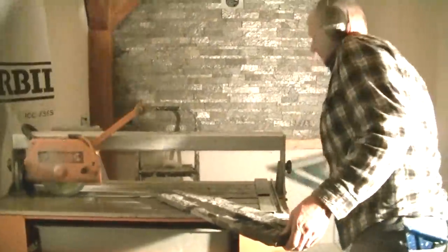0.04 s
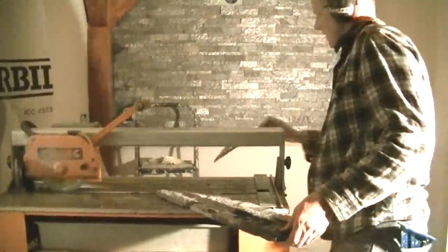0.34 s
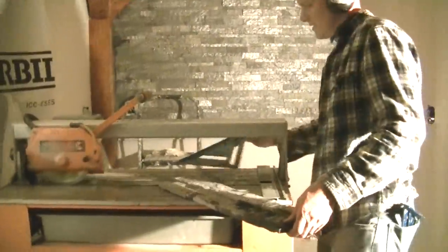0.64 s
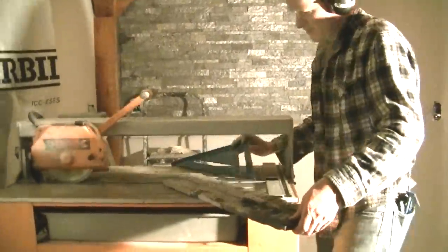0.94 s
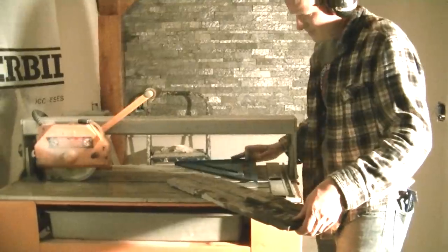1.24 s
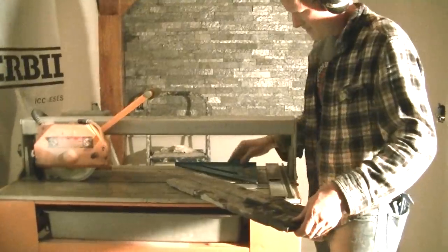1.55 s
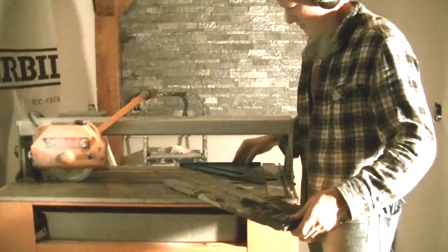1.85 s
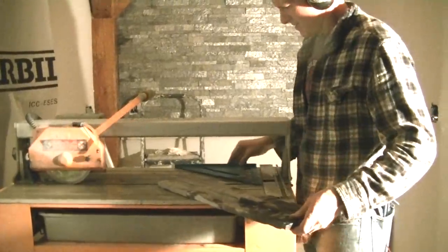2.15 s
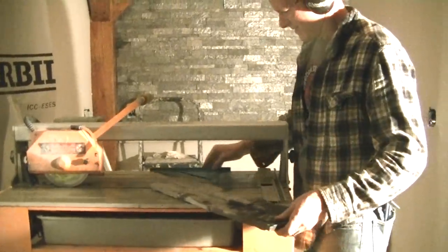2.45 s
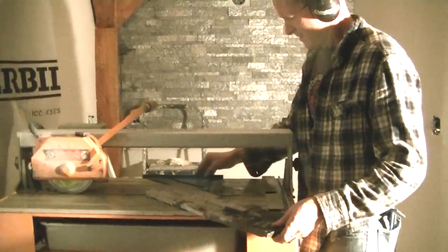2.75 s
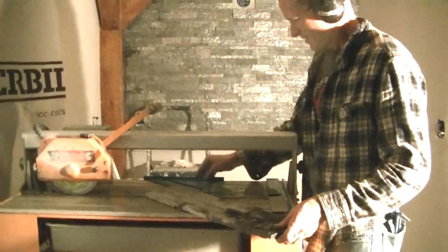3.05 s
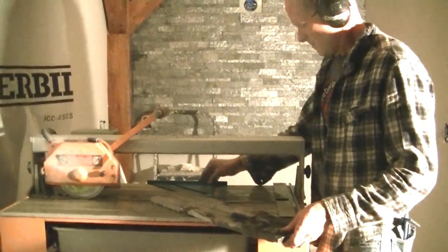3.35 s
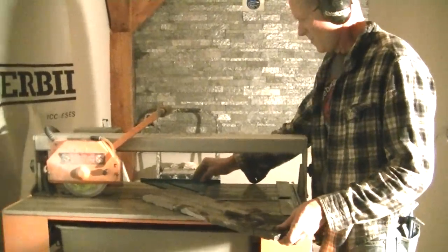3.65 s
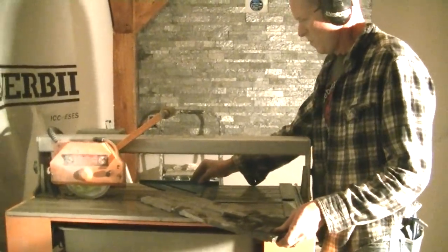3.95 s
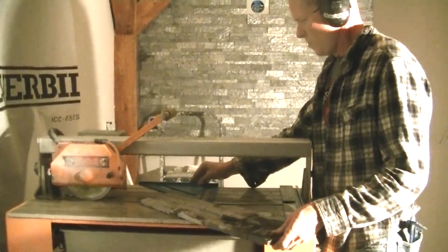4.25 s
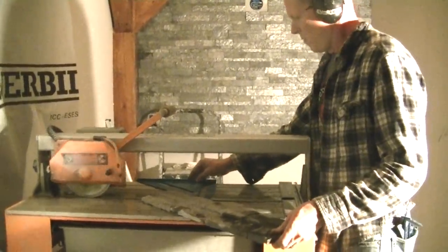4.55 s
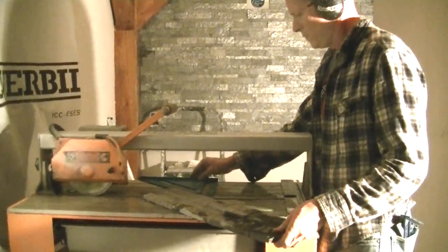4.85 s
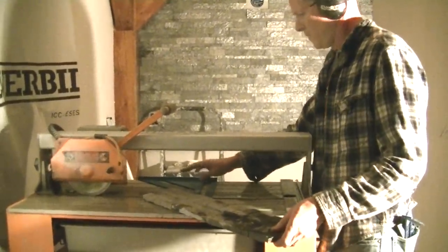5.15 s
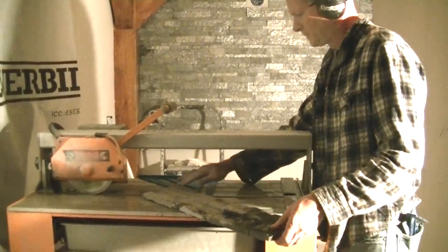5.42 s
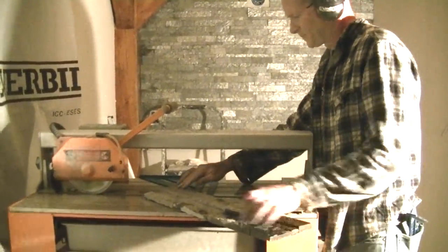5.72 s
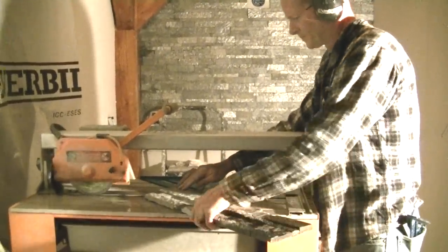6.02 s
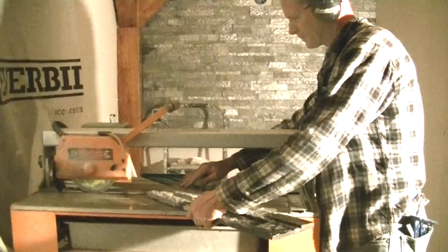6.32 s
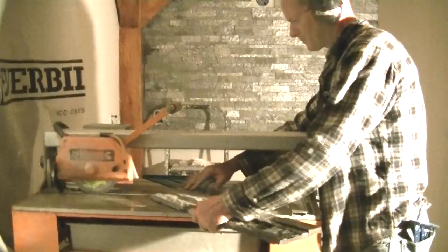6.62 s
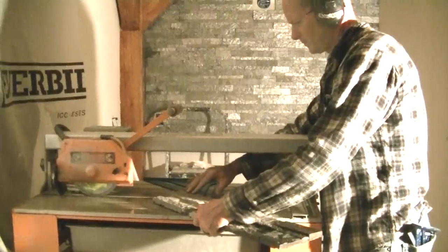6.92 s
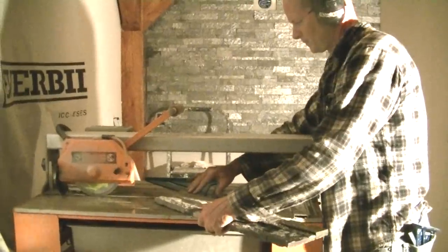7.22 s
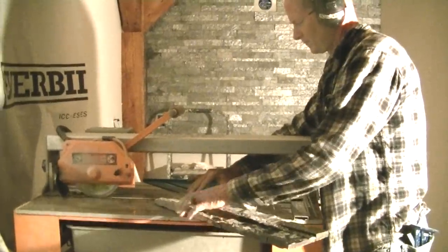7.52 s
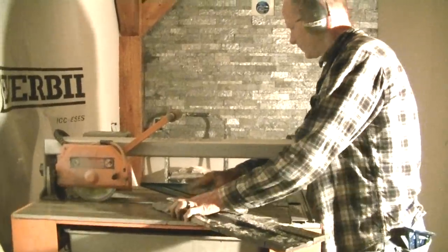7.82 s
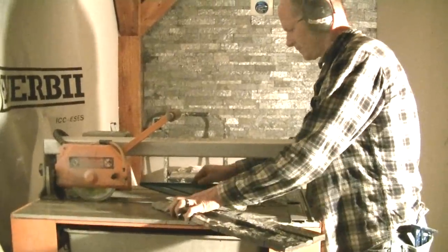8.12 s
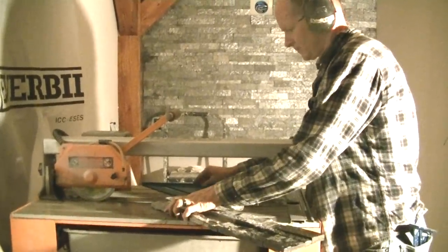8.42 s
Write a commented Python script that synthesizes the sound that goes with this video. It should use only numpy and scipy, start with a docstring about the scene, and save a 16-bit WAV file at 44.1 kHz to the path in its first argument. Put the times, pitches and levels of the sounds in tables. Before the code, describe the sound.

After a faint scrape, a metal set square clangs loudly against a saw rail at about 0.4 seconds and rings until it touches the metal table at 0.8. Hard knocks and short scrapes follow until 2 seconds, each with a thin metallic ring. The square is then pushed against stone strips in long, gritty slides, from about 2.1 to 3 and 3.2 to 3.9 seconds, with scattered knocks and a low judder from the table. A shorter drag comes around 4.4, then light taps until 5.1. After a pause, another uneven scrape runs from about 6.4 to 6.9 seconds, with knocks that make the stone clink. Small, quiet nudges follow, with a sharper clinking knock near 8.3 and a last brief scrape or two. Everything has the short echo of a bare workshop, over a soft steady hiss.

```python
"""In a bare, echoing workshop, a metal set square is picked off the rail of a tile saw with a clang,
put down on the saw table and pushed against stone strips: knocks, long gritty slides, later short nudges.
Each knock and slide shakes the table and sets the metal ringing; the later knocks make the stone clink.
A soft hiss lies under it all, and a limiter flattens the hardest blows."""
import sys
import numpy as np
from scipy import signal
from scipy.fft import rfft, irfft
from scipy.io import wavfile
from scipy.ndimage import uniform_filter1d

SR = 44100
rng = np.random.default_rng(int(sys.argv[2]) if len(sys.argv) > 2 else 0)


def master_out(mix):
    """Clip the mix to full scale and print it as 16-bit PCM to the path in sys.argv[1]."""
    frames = np.transpose(np.atleast_2d(mix))
    ceiling = np.clip(frames, -1, 1)
    pcm = np.round(ceiling * 32767).astype(np.int16)
    wavfile.write(sys.argv[1], SR, pcm)


N = 382347
TIME = np.arange(N) / SR


def from_db(db):
    """Turn decibels (dB) into a number to multiply a sound by."""
    return 10 ** (np.asarray(db) / 20)


def rms_one(x):
    """Scale a sound so that its average power is 1."""
    return x / np.sqrt(np.mean(x ** 2) + 1e-20)


def at_hz(points, hz):
    """Read between the rows of a (frequency, value) table, giving each octave equal room."""
    row_hz, values = np.transpose(points)
    return np.interp(np.log(np.maximum(hz, 1)), np.log(row_hz), values)


def drift(rate):
    """A random curve around zero that heads for a new value `rate` times a second."""
    return np.interp(TIME * rate, np.arange(8192), rng.standard_normal(8192))


def fade(age, t60):
    """A dying away: t60, the fade time, is the seconds it takes to drop by 60 dB."""
    return np.exp(-np.log(1000) * age / t60)


def ring(force, hz, t60):
    """Each push starts a pure tone that dies away."""
    keep, turn = from_db(-60 / (t60 * SR)), 2 * np.pi * hz / SR
    return signal.lfilter([0, np.sin(turn)], [1, -2 * keep * np.cos(turn), keep * keep], force + 1e-18)


def resonate(x, hz, width_hz):
    """Let through only a narrow band around one pitch."""
    keep, turn = np.exp(-np.pi * width_hz / SR), 2 * np.pi * hz / SR
    feed = (1 - keep * keep) / 2 * np.array([1, 0, -1])
    return signal.lfilter(feed, [1, -2 * keep * np.cos(turn), keep * keep], x)


def colour(x, spectrum, peaks=(), size=16384):
    """Give a sound a smooth balance of lows and highs, with ringing peaks on top."""
    hz = np.arange(size // 2 + 1) * SR / size
    lift = 1 + sum(from_db(db) / (1 + (2 * (hz - centre) / width) ** 2) for centre, width, db in peaks)
    # these two steps build a filter that rings after a hit, never before it
    cepstrum = irfft(np.log(from_db(at_hz(spectrum, hz)) * lift))
    response = irfft(np.exp(rfft(2 * cepstrum[:size // 2], size)))
    return signal.fftconvolve(x, response / np.linalg.norm(response))[:N]


def shade(x, zone_db, edges_hz=(500, 2200, 6000)):
    """Set the levels of four zones, from low to high: thump, body, clack and tick."""
    out = 0
    for edge, db in zip(edges_hz, zone_db):
        low = np.tile(signal.butter(2, edge, "low", fs=SR, output="sos"), (2, 1))
        high = np.tile(signal.butter(2, edge, "high", fs=SR, output="sos"), (2, 1))
        out = signal.sosfilt(low, out + x * from_db(db) + 1e-18)
        x = signal.sosfilt(high, x + 1e-18)
    return out + x * from_db(zone_db[-1])


def hiss(level_db, side_db):
    """A steady background hiss, spread wide between left and right."""
    # The tone of the hiss. Each row: frequency in Hz, level in dB.
    spectrum = [(18, -29), (30, -6.5), (44, -13), (55, -20.5), (123, -4.5), (148, -8), (767, -13.5),
                (1360, -17.5), (5310, -22), (11900, -28.5), (15500, -31)]
    mid, side = (colour(rng.standard_normal(N), spectrum) for _ in range(2))
    return from_db(level_db) * (mid + from_db(side_db) * side * [[1], [-1]])


def strokes(ease_db_per_s=17.5):
    """The hand pushes the square in long drags and in short scrapes that ease off as they go."""
    # Long drags, one list each. Each row: time in seconds, friction in dB, low judder in dB,
    # high sharpness in dB.
    drags = [
        [(2.09, -40, 5, 3), (2.162, -39, -2, 9.5), (2.208, -33, 8, -2), (2.398, -28.5, -4, 6),
         (2.472, -24.5, -2, 4), (2.644, -27.5, -3, 0), (2.804, -31.5, 5.5, 4.5), (3.0, -33.5, 0.5, 1.5)],
        [(3.215, -60, -2, 4), (3.225, -46.5, -3, 9.5), (3.295, -32, -8, -1), (3.497, -28, 5, 0),
         (3.641, -35, 8.5, 3.5), (3.677, -26.5, 6, 1), (3.787, -30.5, 4, 8), (3.92, -44.5, 7.5, 0.5)],
        [(4.35, -41, 2, 19.5), (4.394, -37.5, -15, -4.5), (4.428, -42, -2, 4), (4.454, -29, -6, -11),
         (4.508, -38, 5, 0), (4.6, -41, 2, -2), (4.62, -30, -6, -4), (4.66, -39.5, -19, -8)],
        [(6.42, -49, -5, 5.5), (6.562, -39.5, -7, 0), (6.572, -35.5, -7, 12), (6.628, -33.5, -13, 13.5),
         (6.676, -27.5, -5.5, -12), (6.726, -35, 2, -4.5), (6.756, -30, -7.5, -0.5), (6.84, -38, 3.5, -4)],
    ]
    # Short scrapes. Each row: start and length in seconds, then friction, judder and sharpness in dB.
    scrapes = [(0.017, 0.29, -44.5, -17, -7.5), (0.307, .045, -41.5, -12, -1.5),
               (0.355, 0.24, -43.5, -11, 4), (.8, 0.028, -26, 2, -21), (0.863, 0.17, -24.5, -6.5, -2.5),
               (1.173, 0.31, -36.5, 6, -0.5), (1.53, 0.15, -31.5, 5.5, 2), (1.668, 0.054, -23, -9, -6),
               (1.77, 0.22, -30, 6.5, 2.5), (3.928, 0.13, -45, 1, 5), (4.057, .14, -40, 7, -4.5),
               (4.742, 0.048, -50.5, 10, -5), (6.275, 0.11, -49, -8, -10), (6.94, 0.22, -49, 1.5, -4),
               (7.116, 0.055, -42.5, 2.5, 13.5), (7.213, 0.22, -50.5, 2, -3.5),
               (7.332, 0.087, -45.5, 2.5, 1), (7.773, 0.063, -57.5, 12.5, 2.5), (8.07, .08, -62, 11, 11),
               (8.223, 0.13, -40, 2.5, 7), (8.428, 0.061, -35, -1.5, -3.5), (8.63, .04, -40.5, 0, 3.5)]
    eased = [[(start, db, judder, sharp), (start + length, db - ease_db_per_s * length, judder, sharp)]
             for start, length, db, judder, sharp in scrapes]
    return list(drags) + eased


def slide_force(grains_per_s, size_spread_db, rub_db, bite_s, stop_db_per_s, tail_samples=8192):
    """Grit cracks under the sliding edge over a fine rub; the edge catches and lets go unevenly."""
    grain_db = size_spread_db * np.minimum(rng.exponential(1, N), 4)
    grains = from_db(grain_db) * rng.choice([-1, 1], N)
    grit = rms_one(grains * (rng.random(N) < grains_per_s / SR))
    rub = from_db(rub_db) * rng.standard_normal(N)
    catch_db = 1.5 * drift(rate=65)
    force = rms_one((grit + rub) * from_db(catch_db))
    patches_db = 2.0 * drift(rate=93)   # finer and coarser grit changes the very top
    swing_db = 2.5 * drift(rate=22)   # the judder comes and goes
    out = np.zeros(N)
    for stroke in strokes():
        times, *columns = np.transpose(stroke)
        span = slice(int(times[0] * SR), int(times[-1] * SR) + tail_samples)
        t = TIME[span]
        friction_db, judder_db, sharp_db = (np.interp(t, times, column) for column in columns)
        # every stroke bites softly and dies away when the hand stops
        bite = np.clip((t - times[0]) / bite_s, 0, 1)
        strength = bite * from_db(friction_db - stop_db_per_s * np.maximum(t - times[-1], 0))
        zone_db = (judder_db + swing_db[span], 0, sharp_db, sharp_db + patches_db[span])
        out[span] += shade(force[span] * strength, zone_db)
    return out


def saw_table(force):
    """The table, its tray and the strips on it turn knocks and rubbing into sound."""
    # The overall tone of the loaded table. Each row: frequency in Hz, level in dB.
    spectrum = [(30, -47), (60, -39.5), (88, -14.5), (160, -9.5), (240, -1.5), (380, -4), (480, -3.5),
                (1400, -8), (2200, -9), (3200, -7), (4400, -13), (8600, -18), (12000, -27.5), (16000, -36)]
    # Pitches that the tray and strips favour. Each row: pitch in Hz, width in Hz, strength in dB.
    tray_peaks = [(86, 7, -7), (239, 19, -4.5), (324.5, 7.8, 3), (347, 18, -1.5), (383.5, 11, 3.5),
                  (920, 100, -13.5), (1074, 30, -4), (1425, 78, -7.5), (1586, 48, -8), (3330, 77, -14)]
    return colour(force, spectrum, tray_peaks)


def metal_ring(force):
    """The square rings at every touch: freely while held by one end, less once the hand lies on it."""
    # How freely it rings. Each row: time in seconds, level in dB.
    freedom = [(1.4, 2), (2.1, -1.5)]
    # The metal's own tones. Each row: pitch in Hz, level in dB, fade time in seconds.
    tones = [(392.6, -44.5, 0.68), (684, -46, 0.19), (834, -50.5, 0.25), (1244, -53, 0.72),
             (2760, -55, .35), (3380, -51, 0.61), (3817, -58.5, .4), (4270, -63.5, .4), (4520, -39, 0.36),
             (5250, -53.5, .4), (5770, -57.5, 0.46), (5880, -49.5, 0.4), (6660, -68.5, 0.54),
             (7472, -59.5, .45), (8700, -61, 0.73)]
    push = force * from_db(np.interp(TIME, *np.transpose(freedom)))
    return sum(from_db(db) * ring(push, hz, t60) for hz, db, t60 in tones)


def knock_force(chatter_s, chatter_db, settle_s, heavy_db, size=8192):
    """A knock is a sharp hit with tiny bounces and the struck spot's note, then a dull settling."""
    # Knocks of metal and stone. Each row: start in seconds, force in dB, thump, clack and tick in dB,
    # the struck spot's pitch in Hz, its strength in dB.
    knocks = [(.045, -43, -23, 3, 3, 1700, 6), (0.065, -36.5, -5, 2, -4, 1670, 14),
              (.364, 6, -8, -7, -11.5, 1540, 4), (.791, -19, 3, 6, -7, 3400, 0.5),
              (1.057, -7.5, -0.5, 4, -4, 5480, 7.5), (1.414, -17, 7, 1, -12.5, 515, -12),
              (1.658, -13.5, -2, 0, -17, 1060, 7), (2.2, -32, 14, -11, 6, 256, 6.5),
              (2.438, -20.5, 0, -10, 2, 1040, -1), (2.591, -24, 1, 7.5, 5, 1570, 13.5),
              (3.223, -47.5, -2, -1, 10, 3100, 14.5), (3.786, -31, 4.5, 11.5, -12, 355, 14),
              (3.866, -36.5, 7, 10, 8, 88, 17), (4.285, -46, 9, 9.5, 11.5, 3200, -7),
              (4.619, -33.5, -7, 0.5, -4, 200, 7), (4.78, -46, 11.5, -10, -16, 418, 13),
              (4.917, -38.5, -8, 0.5, 3, 7000, 0), (5.098, -35, -8.5, -7, -17, 155, 18),
              (5.115, -30, -12, -3, -4.5, 1010, 1.5), (6.569, -37.5, -13, 15.5, 11, 3170, -7),
              (6.641, -28.5, 2, 9, -15, 3900, 7.5), (6.853, -31, -5, 6.5, 8, 875, 4),
              (7.226, -35, -20, 0, 4.5, 8400, 8), (7.742, -57, 11.5, 10.5, 9.5, 360, 4.5),
              (7.795, -50, -7, -3, -11, 860, 9.5), (8.276, -25, 4, 4, -7, 760, 10),
              (8.283, -21, -1, -25, -23, 244, 7.5)]
    force, age = np.zeros(N + 2 * size), np.arange(size) / SR
    click = signal.unit_impulse(size)
    for start, db, thump_db, clack_db, tick_db, spot_hz, spot_db in knocks:
        note = from_db(spot_db) * resonate(click, spot_hz, width_hz=42 + 0.041 * spot_hz)
        hit = (start, db, (thump_db, 0, clack_db, tick_db))
        # a heavy knock tips the piece, which drops back; light knocks hardly do
        settle_db = -17 + 2 * min(db - heavy_db, 0)
        settle = (start + settle_s, settle_db, (0.5, 1.5, -19.5, -18.5))
        for when, level_db, zone_db in (hit, settle):
            bounces = rng.standard_normal(size) * np.exp(-age / chatter_s)
            blow = click + from_db(chatter_db) * bounces / np.linalg.norm(bounces)
            at = round(when * SR)
            force[at:at + size] += from_db(level_db) * shade(blow / np.linalg.norm(blow) + note, zone_db)
    return force[:N]


def rail_clang(strike_s, touchdown_s, damped_t60, waver_db, buzz_db, buzz_t60):
    """The square strikes the rail and rings in the air until it touches the table."""
    # Rail and square ringing together. Each row: pitch in Hz, level in dB, fade time in seconds.
    tones = [(626, -16.5, 0.29), (666, -7.5, 0.45), (677, -6.5, 1.3), (688, -4.5, 0.37), (1174, -6.5, .45),
             (1110, -10, 0.72), (1204, -8, 0.6), (1383, -7.5, .6), (1699, -13, 0.42), (1818, 0.5, 0.43),
             (2152, -23.5, 3.7), (2416, -13, .55), (2750, -10.5, 0.49), (3106, -25, 6.4),
             (3400, -16.5, .54), (4170, -23.5, .5), (4480, -25, 1.8), (5950, -19, 0.43),
             (6546, -27.5, 0.56), (7080, -16, 0.22), (7919, -28.5, .45)]
    blow = signal.unit_impulse(N, round(strike_s * SR))
    damping = fade(np.maximum(TIME - touchdown_s, 0), damped_t60)
    # at first the square still buzzes against the rail, which roughens every tone
    buzz = from_db(buzz_db) * fade(np.maximum(TIME - strike_s, 0), buzz_t60)
    out = 0
    for hz, db, t60 in tones:
        waver = from_db(waver_db * drift(rate=34))   # the hand turns the square
        roughness = np.sqrt(1 - buzz ** 2) + buzz * drift(rate=110)
        out += from_db(db) * waver * roughness * ring(blow, hz, t60)
    return damping * out


def stone_clink(force, from_s):
    """Once the square has come up against the stone strips, each knock makes them ring too."""
    # The strips' own tones. Each row: pitch in Hz, level in dB, fade time in seconds.
    tones = [(1036, -40.5, 0.32), (1670, -43.5, .45), (2190, -41, 0.43), (3510, -44.5, 0.44)]
    return sum(from_db(db) * ring(force * (TIME > from_s), hz, t60) for hz, db, t60 in tones)


def room_tail(build_s, size=36000):
    """The workshop's answer to one click: a blur of echoes, shorter and wider in the treble."""
    # How long the echo lasts. Each row: frequency in Hz, fade time in seconds.
    fade_times = [(100, 1), (260, 0.58), (700, 0.59), (1840, 0.4957), (4850, 0.47), (12800, 0.28)]
    # How wide the echo is. Each row: frequency in Hz, level of the sides against the middle in dB.
    widths = [(60, -20), (250, -28.5), (600, -20), (2200, -24), (4500, -13), (9000, -4), (15000, -7.5)]
    age, hz = np.arange(size) / SR, np.arange(size // 2 + 1) * SR / size
    noise_spectrum = rfft(rng.standard_normal((2, size)))
    edges = np.r_[0, np.geomspace(100, SR / 2, 25)]
    build_up = 1 - np.exp(-age / build_s)
    tail = np.zeros((2, size))
    for low, high in zip(edges, edges[1:]):
        centre, inside = (low + high) / 2, (hz >= low) & (hz < high)
        band = irfft(noise_spectrum * inside, size) * fade(age, at_hz(fade_times, centre)) * build_up
        mid, side = band * np.sqrt(inside.mean()) / np.linalg.norm(band, axis=1, keepdims=True)
        tail += mid + from_db(at_hz(widths, centre)) * side * [[1], [-1]]
    return tail


def in_room(x, tails, direct_db, echo_db, move_rate):
    """Direct sound plus an echo that shifts as the touched spot and the person beside it move."""
    shares = np.array([drift(move_rate) for _ in tails])
    shares /= np.linalg.norm(shares, axis=0)
    echo = sum(signal.fftconvolve((share * x)[None], tail, axes=1)[:, :N]
               for share, tail in zip(shares, tails))
    return from_db(direct_db) * x + from_db(echo_db) * echo


def limiter(x, threshold_db, slope, attack_s, release_db_per_s):
    """Turn the sound down when it gets too loud, then quickly back up."""
    power = uniform_filter1d(np.mean(x ** 2, axis=0), int(attack_s * SR))
    over_db = np.maximum(10 * np.log10(np.maximum(power, 1e-12)) - threshold_db, 0)
    recovery_db = release_db_per_s * TIME
    held_db = np.maximum.accumulate(over_db + recovery_db) - recovery_db
    return x * from_db(-slope * uniform_filter1d(held_db, size=64))


def scene():
    """Knocks and slides shake the table and the metal; all of it echoes in the workshop."""
    knocks = from_db(33.5) * knock_force(chatter_s=0.0084, chatter_db=9.5, settle_s=.016, heavy_db=-19)
    slides = from_db(6) * slide_force(grains_per_s=1400, size_spread_db=4, rub_db=-4,
                                      bite_s=0.028, stop_db_per_s=450)
    table = saw_table(knocks + slides)
    ringing = metal_ring(from_db(-6.5) * knocks + from_db(-20.5) * slides)
    ringing += rail_clang(strike_s=.364, touchdown_s=.791, damped_t60=.12,
                          waver_db=3, buzz_db=-1, buzz_t60=1.2)
    ringing += stone_clink(from_db(-4.5) * knocks, from_s=4.5)
    tails = [room_tail(build_s=.002) for _ in range(3)]
    sound = in_room(table, tails, direct_db=-7.5, echo_db=-3.5, move_rate=12)
    sound += in_room(ringing, tails, direct_db=-8, echo_db=-6.5, move_rate=8)
    sound += hiss(level_db=-59, side_db=1)
    return sound * from_db([[-.4], [.4]])   # a little louder on the right


def record(dry):
    """Flatten the hardest blows, round off the peaks and cut the very highest treble."""
    limited = limiter(dry, threshold_db=-14, slope=0.76, attack_s=0.014, release_db_per_s=161)
    rounded = 1.3 * np.tanh(limited / 1.3)
    top_cut = signal.ellip(12, .1, 80, 15900, fs=SR, output="sos")
    return signal.sosfilt(top_cut, rounded)


dry = scene()
out = record(dry)
master_out(out)
```